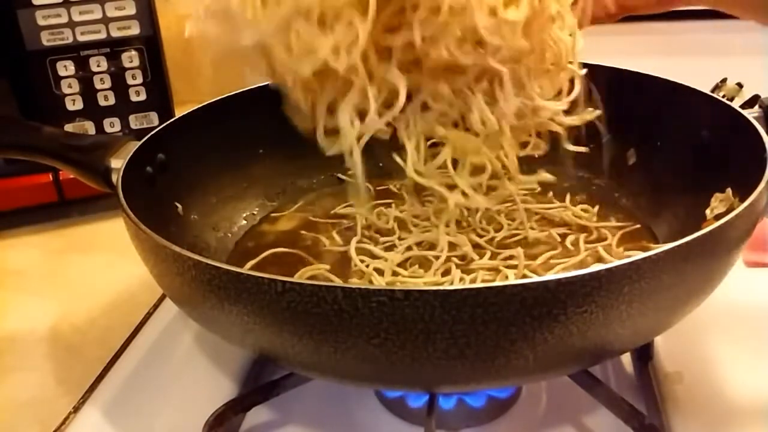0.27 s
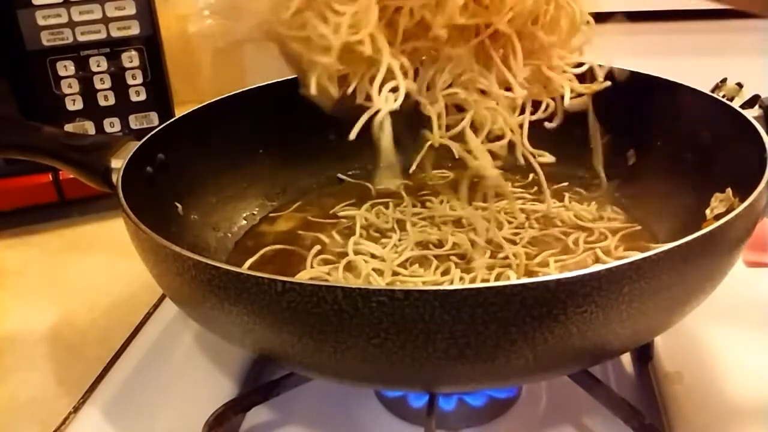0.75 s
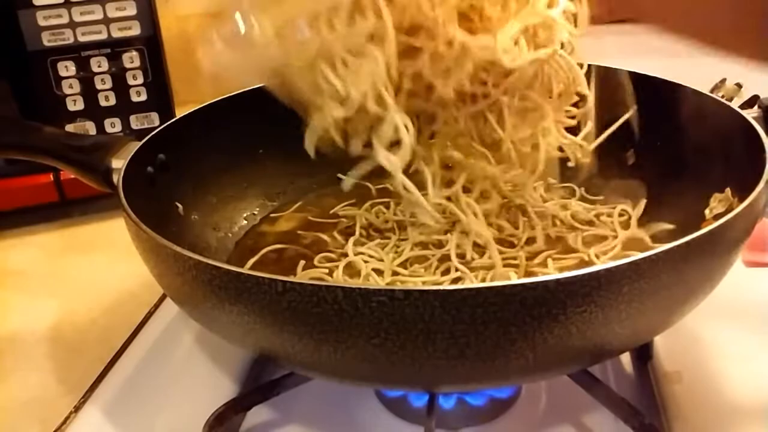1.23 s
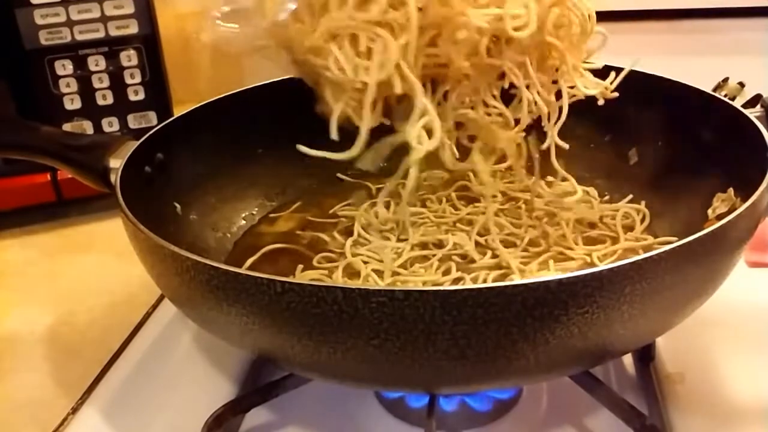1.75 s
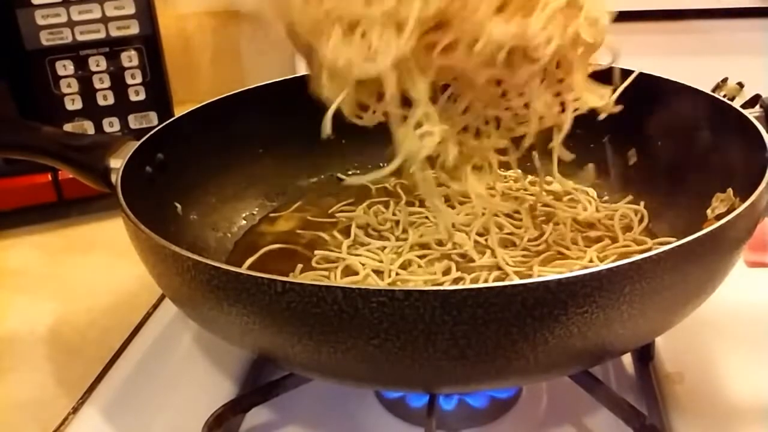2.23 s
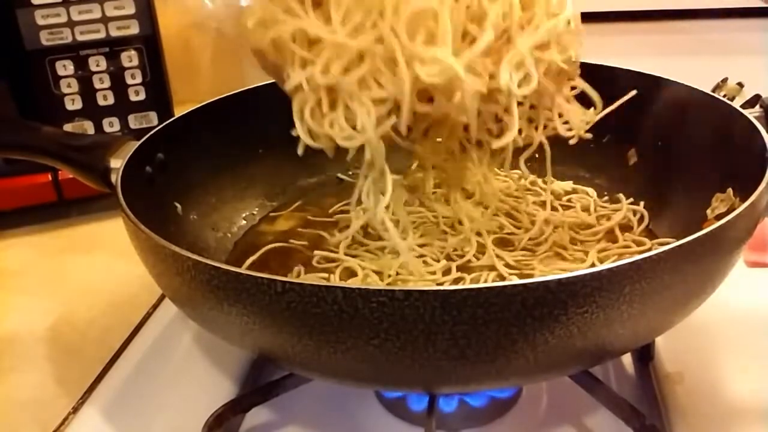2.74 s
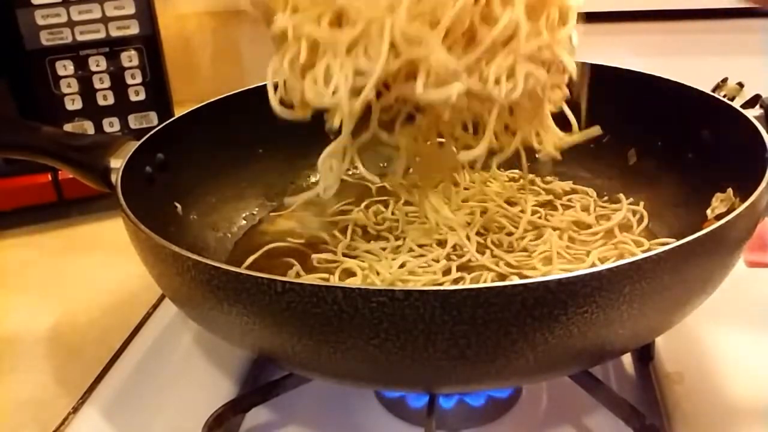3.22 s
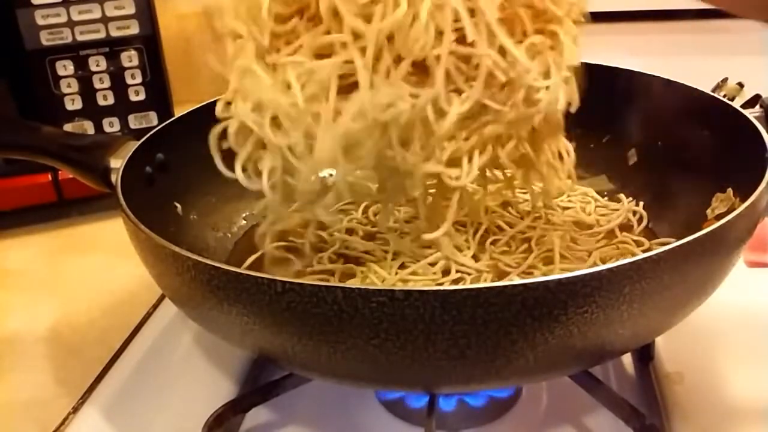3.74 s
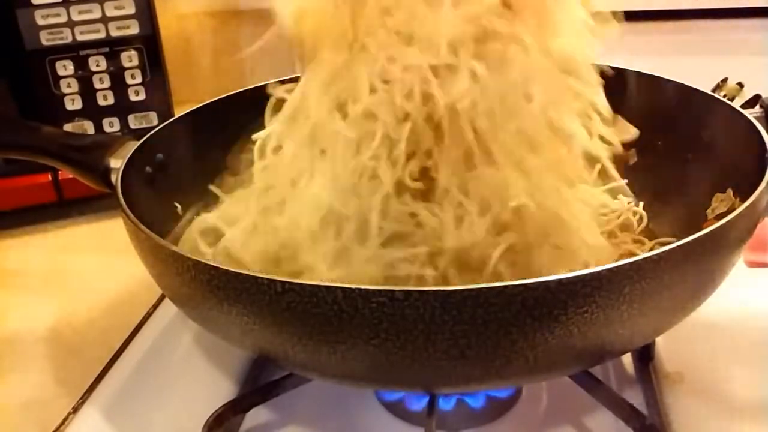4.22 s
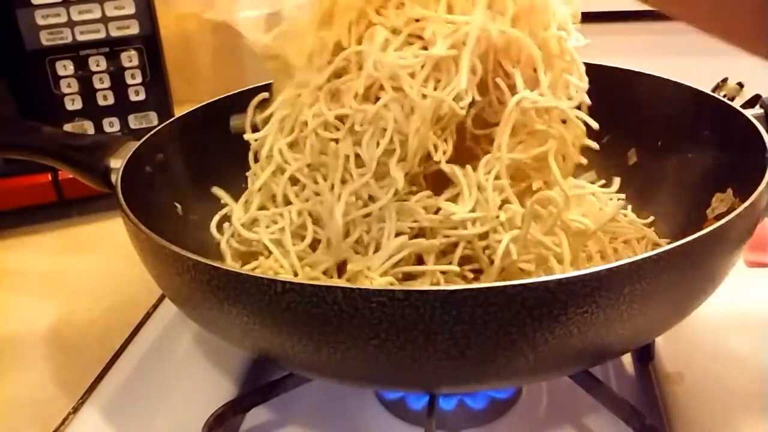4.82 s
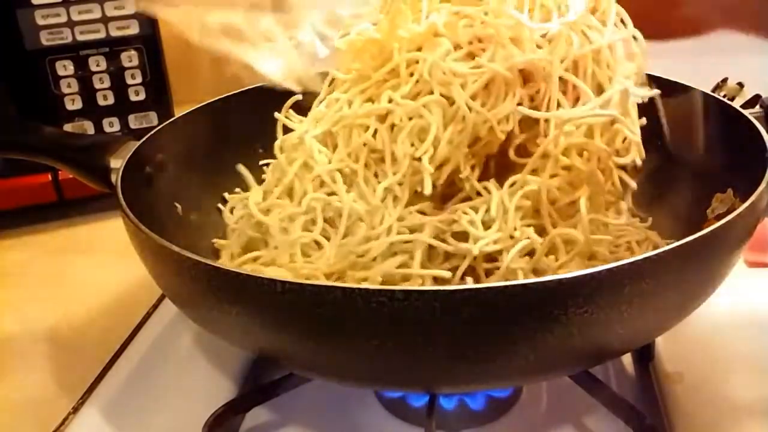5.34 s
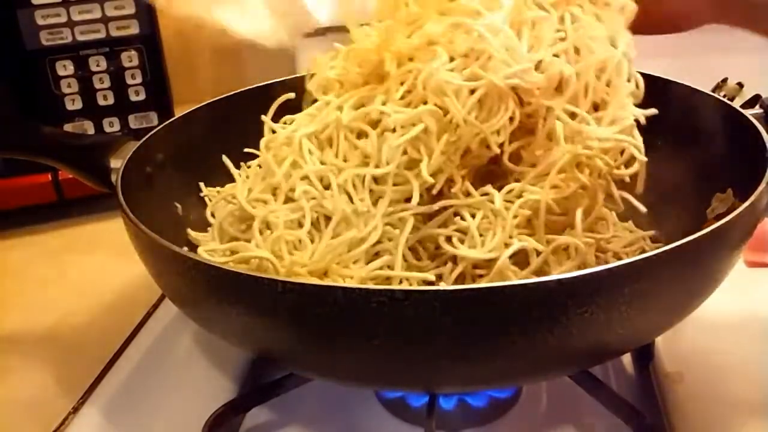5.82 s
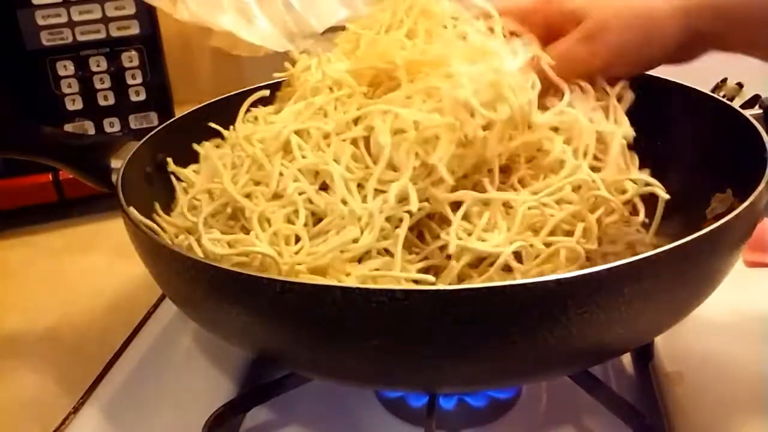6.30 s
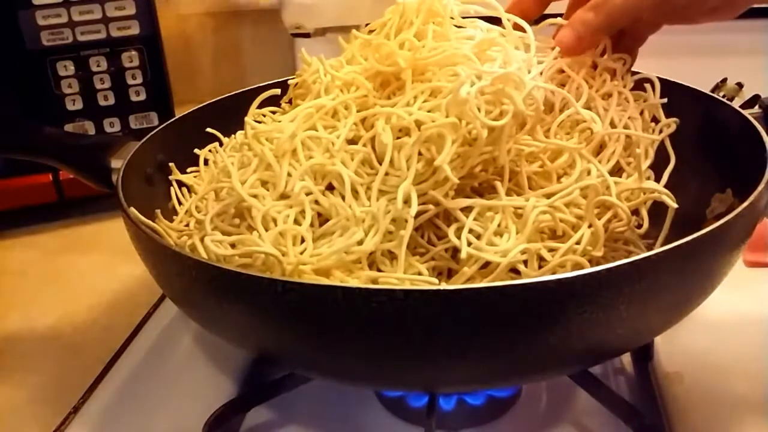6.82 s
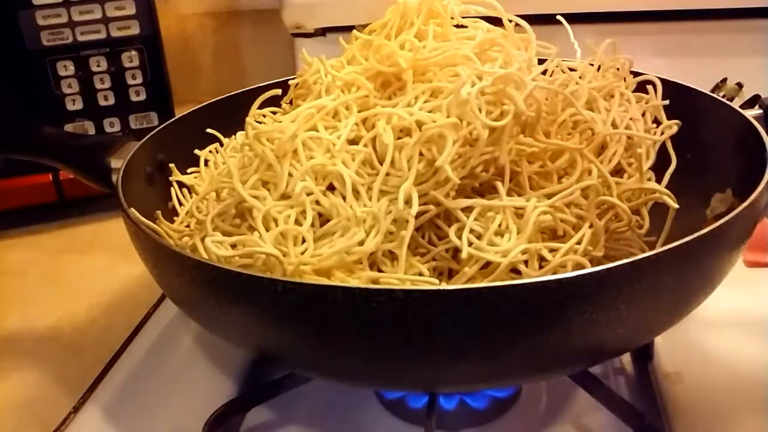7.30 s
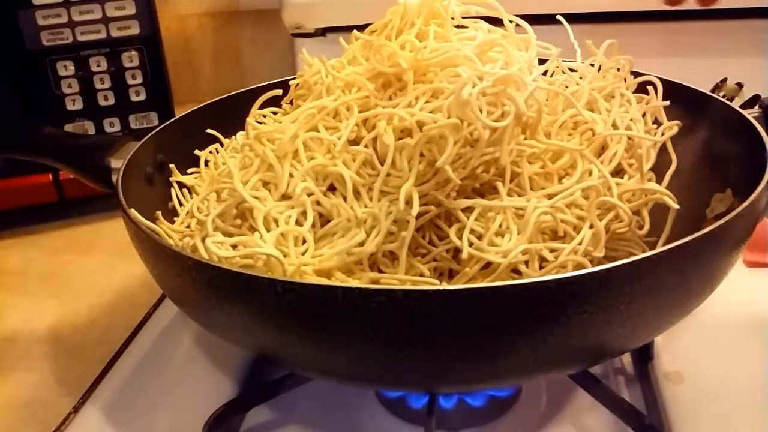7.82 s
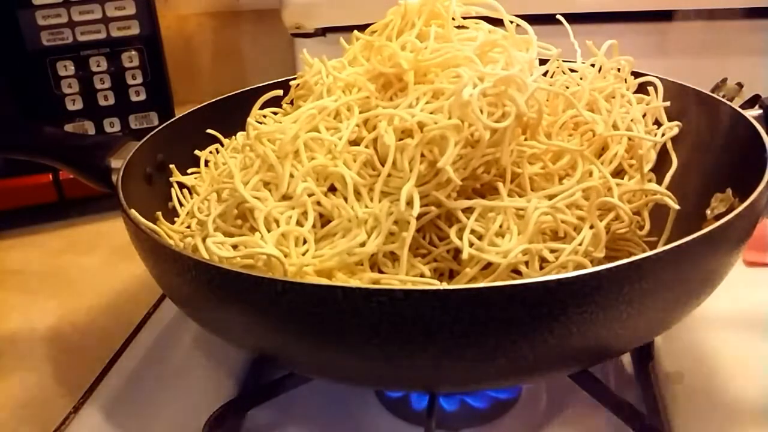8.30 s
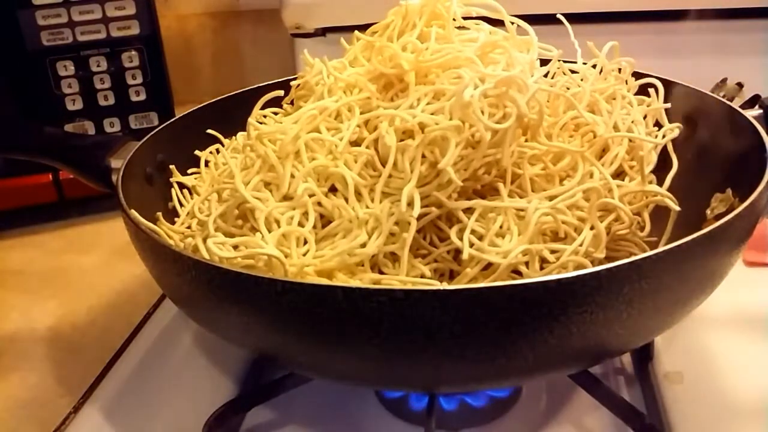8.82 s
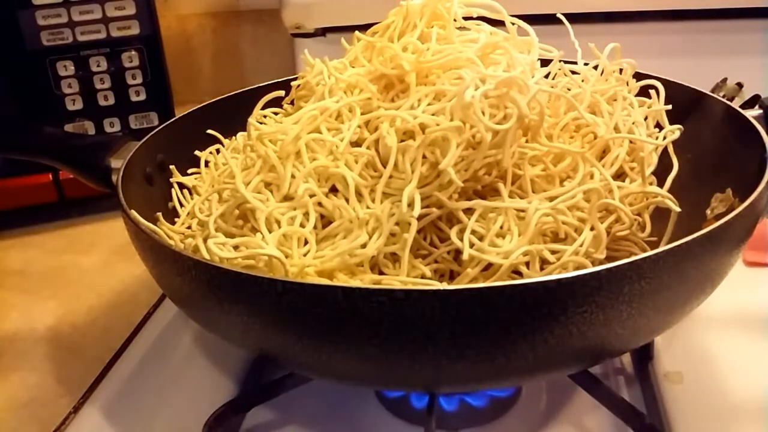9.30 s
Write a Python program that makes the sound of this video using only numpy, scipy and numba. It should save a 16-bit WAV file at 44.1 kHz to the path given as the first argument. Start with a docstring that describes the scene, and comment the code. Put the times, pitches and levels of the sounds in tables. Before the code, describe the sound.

Rapid overlapping shakes of crackly film and brittle strands, several each second, with crisp high snaps and lower flexing. A fine scraping slide empties the bag, the level falls sharply, and only scattered pops, hollow ticks and faint rustling remain. The sound drops out for an instant, then light crumpling returns and swells slightly at the end. Close phone microphone, short kitchen reverberation, very quiet flame and hum.

```python
"""A plastic bag crinkles in dense surges as dry noodles are shaken into a wok, close up in a small kitchen.
The heap slides out and settles with snaps and a fine rustle, then the empty bag is crumpled aside.
Film and strands are clumped clicks that ring as damped sines; snaps and ticks are shaped noise bursts.
A gas flame of coloured noise murmurs underneath with a faint hum; the sound drops out once."""
import sys
import numpy as np
from scipy import signal
from scipy.fft import rfft, irfft
from scipy.io import wavfile
from scipy.ndimage import uniform_filter1d
from numba import njit

SR = 44100
rng = np.random.default_rng(int(sys.argv[2]) if len(sys.argv) > 2 else 0)


def master(y):
    """Save y as 16-bit WAV."""
    cut = np.clip(np.atleast_2d(y).T, -1, 1)
    pcm = np.round(cut * 32767)  # scale
    wavfile.write(sys.argv[1], SR, pcm.astype(np.int16))


N = 421137
T = np.arange(N) / SR  # time of each sample [s]
TOP_HZ = 15900  # upper edge of the whole sound
EMPTY_S, CRUMPLED_S = 4.28, 7.05  # the bag becomes slack, then is crumpled


def undb(db):
    """Decibels to gain."""
    return 10 ** (np.asarray(db) / 20)


def unit(x):
    """Scale to rms 1."""
    return x / np.sqrt(np.mean(x ** 2))


def fade(t, t60):
    """Exponential decay, 60 dB down at t60 [s]."""
    return np.exp(-np.log(1000) * t / max(t60, 1e-4))


def add(track, s, sound):
    """Mix a sound into a track at time s [s]."""
    i = max(int(s * SR), 0)
    track[i:i + len(sound)] += sound[:N - i]


def split(x, hz):
    """The parts below and above a frequency."""
    return [signal.sosfilt(signal.butter(3, hz, kind, fs=SR, output="sos"), x) for kind in ("low", "high")]


def colour(x, points, size=2048):
    """Causal, minimum-phase filter that follows (frequency [Hz], level [dB]) points."""
    hz, db = np.transpose(points)
    f = np.maximum(np.arange(size // 2 + 1) * SR / size, 1)
    gain = undb(np.interp(np.log(f), np.log(hz), db))
    # folding the cepstrum forward in time makes the filter causal
    cepstrum = irfft(np.log(gain))
    cepstrum[1:size // 2] *= 2
    cepstrum[size // 2 + 1:] = 0
    impulse = irfft(np.exp(rfft(cepstrum)))
    return signal.oaconvolve(x, impulse)[:len(x)]


def resonate(x, hz, width):
    """One resonance, gain 1 at its centre, with a width in Hz."""
    return signal.lfilter(*signal.iirpeak(hz, hz / width, fs=SR), x)


def walk(rate):
    """Random wander: straight lines between normal draws, rate of them per second."""
    knots = np.arange(0, T[-1] + 1, 1 / rate)
    return np.interp(T, knots, rng.standard_normal(len(knots)))


def gesture(s, length, db, attack, t60):
    """Gain of one movement: it builds up to time s, holds for its length and dies away."""
    rise = np.clip((T - s) / max(attack, 1e-3) + 1, 0, 1)
    return undb(db) * rise ** 2 * fade(np.clip(T - s - length, 0, 2), t60)


@njit
def ring(start, turn, decay, size, count):
    """Sum of damped sines, one for each vibrating facet; turn and decay are per sample."""
    out = np.zeros(count)
    for k in range(len(start)):
        z, p = size[k] + 0j, np.exp(1j * turn[k] - decay[k])
        for i in range(start[k], min(start[k] + int(6 / decay[k]), count)):
            z *= p
            out[i] += z.imag
    return out


def crackle(rate, spread_db, ring_s, clump_db, count=14):
    """Clicks of very uneven size that come in clumps; each rings a handful of facets with their own pitches."""
    clicks = int(rate * T[-1])
    chance = rng.random((clicks, 2 + 2 * count))
    start = np.repeat((chance[:, 0] * N).astype(np.int64), count)
    click_db = -spread_db * np.log(np.maximum(chance[:, 1], .015))
    size = np.repeat(undb(click_db), count)
    place = .04 + .96 * chance[:, 2:2 + count].ravel()
    hz = TOP_HZ * place ** 2
    # large facets are low and ring longer
    t60 = ring_s * (.5 + chance[:, 2 + count:].ravel()) / np.sqrt(place)
    turn, decay = 2 * np.pi * hz / SR, np.log(1000) / (t60 * SR)
    x = ring(start, turn, decay, size * np.sqrt(place / t60), N)
    x = x * undb(clump_db * walk(45))
    # level the crackle over short stretches, so that each movement's own level sets its loudness
    nearby_power = uniform_filter1d(x ** 2, size=3000)
    return x / np.sqrt(nearby_power + np.mean(x ** 2) / 100)


def buckle(x, lo_hz, hi_hz, depth_db, rate, count=6):
    """The colour of the film keeps shifting, as several broad resonances wander independently in level."""
    out = x
    for hz in np.geomspace(lo_hz, hi_hz, count):
        out = out + resonate(x, hz, hz / 3) * (undb(depth_db * walk(rate)) - 1)
    return out


# film of the full bag and of the slack bag, as spectra: (frequency [Hz], relative level [dB])
FULL_BAG_SPECTRUM = [(25, -26), (60, -18.5), (110, -17.5), (170, -13), (300, -5.5), (460, 0.5), (700, -3),
                     (1200, -4), (3200, -4), (5000, -2.5), (6500, -1), (8500, -17), (12000, -20),
                     (16000, -29.5)]
EMPTY_BAG_SPECTRUM = [(40, -22), (110, -17), (200, -3.5), (400, -1.5), (800, 1), (1300, -3.5), (2300, -3.5),
                      (3500, -5), (5700, -3.5), (7200, -8), (8500, -18), (16000, -28)]
# shakes and squeezes of the bag, levels before the trims of each stage:
# (time [s], length [s], crinkle level [dB], low flexing relative to crinkle [dB])
SQUEEZES = [(0.0, 0.1, -35, -9), (0.167, 0.061, -36, -7.5), (0.334, .15, -43, -6.5),
            (0.729, 0.2, -41.5, -6), (0.969, .13, -35, -5), (1.13, 0.15, -39, -6),
            (1.254, 0.072, -34.5, -11), (1.378, 0.14, -39, -7), (1.597, .005, -44.5, -7),
            (1.71, 0.13, -47.5, -5.5), (1.811, .15, -39, -8.5), (1.982, .105, -36, -4),
            (2.093, 0.028, -37, -10.5), (2.235, 0.041, -42, -9.5), (2.286, 0.062, -36.5, -9.5),
            (2.467, 0.13, -41.5, -7.5), (2.673, 0.14, -42, -7.5), (2.813, .12, -39.5, -8),
            (3.054, 0.13, -41, -7), (3.21, .02, -44.5, -8), (3.344, 0.034, -44.5, -4),
            (3.396, 0.13, -36, -6.5), (3.525, .11, -33.5, -10.5), (3.684, 0.12, -43.5, -7.5),
            (3.811, .155, -36.5, -10), (3.984, 0.15, -46.5, -10), (4.315, 0.045, -52.5, -6),
            (4.383, 0.0099, -43.5, -3.5), (4.45, 0.13, -54.5, -17), (4.678, 0.096, -56.5, -2),
            (4.881, 0.06, -53.5, -2.5), (5.098, 0.068, -58, -2.5), (5.251, .02, -52, -9),
            (5.417, 0.12, -59, -2), (5.547, 0.026, -46, -6.5), (7.177, 0.078, -56.5, 2.5),
            (7.582, 0.018, -60, -2), (7.682, 0.02, -49.5, -8), (7.8, 0.12, -71, -15),
            (8.242, 0.0059, -53, -14), (8.357, 0.068, -70.5, 4.5), (8.55, 0.19, -78, 7.5),
            (8.752, 0.12, -68, 2.5), (8.897, .06, -53.5, -6), (8.966, .13, -50.5, -5.5),
            (9.148, .06, -46.5, -6.5), (9.239, 0.037, -53, -7), (9.33, 0.13, -66.5, 2)]
# the film tightens quickly and relaxes more slowly
SQUEEZE_ATTACK_S, SQUEEZE_T60_S, FLEX_T60_S = 0.026, 0.14, .17
# the full bag never rests in the hand (levels before the trims)
HELD_DB, HELD_FLEX_DB = -55.5, -58.5


def bag(span, spectrum, rate, spread_db, crinkle_db, flex_db, held=0):
    """Each squeeze within the span makes creases crackle in the treble while whole panels flex lower down."""
    high, low = held * undb(HELD_DB), held * undb(HELD_FLEX_DB)
    for s, length, db, share_db in SQUEEZES:
        if span[0] <= s < span[1]:
            high = np.maximum(high, gesture(s, length, db, SQUEEZE_ATTACK_S, SQUEEZE_T60_S))
            low = np.maximum(low, gesture(s, length, db + share_db, SQUEEZE_ATTACK_S, FLEX_T60_S))
    creases = crackle(rate, spread_db, ring_s=0.0041, clump_db=1.5)
    flex, crinkle = split(colour(creases, spectrum), 917)
    flex = buckle(flex, 200, 740, depth_db=2.5, rate=14)
    crinkle = buckle(crinkle, 1200, 5000, depth_db=2.5, rate=25)
    return unit(crinkle) * high * undb(crinkle_db) + unit(flex) * low * undb(flex_db)


# gas flame spectrum: (frequency [Hz], relative level [dB])
BURNER_SPECTRUM = [(25, -17.5), (56, -6.5), (80, -10.5), (150, -7.5), (200, -5.5), (260, -8), (345, 0),
                   (400, -7), (480, -10), (900, -12), (2000, -19.5), (6000, -23), (9000, -25.5),
                   (16000, -42.5)]
BURNER_DB = -76  # level about which the flame flutters


def burner():
    """The gas flame, a soft flutter of noise."""
    flame = unit(colour(rng.standard_normal(N), BURNER_SPECTRUM))
    return flame * undb(BURNER_DB + 1.2 * walk(23))


# faint kitchen hum, levels before the trim: (frequency [Hz], level [dB])
HUM_TONES = [(150.7, -96.5), (242.2, -87), (339.1, -87.5)]
HUM_TRIM_DB = -1


def hum():
    """A few faint tones that waver in pitch and strength."""
    out = np.zeros(N)
    for hz, db in HUM_TONES:
        gain = np.sqrt(2) * undb(db + HUM_TRIM_DB + 2.5 * walk(9))
        phase = 2 * np.pi * np.cumsum(hz * (1 + 0.0055 * walk(5.1))) / SR
        out = out + gain * np.sin(phase)
    return out


# general colour of a snap: (frequency [Hz], relative level [dB])
SNAP_SPECTRUM = [(60, -11.5), (170, -6), (350, 4), (1300, 8.5), (3500, -2), (6200, 2), (7200, -4),
                 (8500, -10), (12000, -14), (16000, -20)]
# single creases and strands giving way, levels before the trims:
# (time [s], level [dB], low part relative to high part [dB], pitch of the crack [Hz], t60 of the shiver [s])
SNAPS = [(0.1988, -14.5, -25, 4070, .012), (0.231, -19.5, -30, 6560, .014),
         (0.68, -31.5, -11.5, 3020, .017), (0.7254, -25.5, -24, 5600, .011),
         (0.8744, -29.5, -8.5, 5170, .016), (0.967, -26, -9, 5670, .014), (1.0166, -24, -14, 5760, .012),
         (1.1963, -22.5, -18.5, 6100, .014), (1.2825, -18.5, -26, 4900, .018),
         (1.676, -27, -20, 6500, 0.013), (1.7686, -29.5, -7, 5650, .014), (1.819, -28, -7.5, 4780, .012),
         (1.8485, -20, -20, 2850, 0.0083), (1.868, -21.5, -17, 6520, .014), (1.92, -25, -15, 5390, .012),
         (1.9966, -20, -9.5, 6400, 0.011), (2.0534, -18, -27, 5500, .019), (2.0807, -18.5, -32, 5450, .014),
         (2.292, -20.5, -12, 6000, .015), (2.785, -26, -19, 5730, .014), (2.8952, -25, -23, 5060, .01),
         (3.004, -21.5, -23, 4530, 0.011), (3.089, -24.5, -24, 2940, 0.016),
         (3.1458, -20.5, -23, 5000, .018), (3.239, -24.5, -31, 5060, .013),
         (3.3013, -30, -8.5, 6010, 0.025), (3.3796, -21, -16, 5850, .011), (3.407, -22, -17, 5450, .015),
         (3.5134, -21.5, -19, 5710, .019), (3.597, -14.5, -38, 5960, .0095),
         (3.7567, -26.5, -26, 6500, .008), (4.1765, -29.5, -20, 5200, .017),
         (4.3915, -28.5, -17, 7100, 0.013), (4.4352, -33, -31, 2950, .015), (4.4604, -32, -19, 5260, 0.016),
         (4.536, -38.5, -25, 5070, .011), (4.6109, -30, -15.5, 6300, 0.013),
         (4.686, -31.5, -20, 4680, .012), (4.712, -21.5, -18, 5070, 0.012), (5.003, -26, -17, 5900, 0.028),
         (5.1088, -43, -15, 6590, .015), (5.242, -29, -19, 5950, 0.055), (5.3665, -32, -18.5, 6310, .012),
         (5.41, -26, -14.5, 5830, .042), (5.5667, -25.5, -20, 6500, 0.012), (5.634, -41, -26, 6210, .016),
         (5.74, -43, -24, 7500, .018), (5.8597, -45.5, -23, 7500, .015), (5.9946, -43.5, -29, 6430, .014),
         (6.12, -44.5, -26, 6240, .014), (7.15, -34, -16, 5360, .011), (7.228, -33, -14, 4310, 0.016),
         (7.281, -47.5, 3, 3370, .012), (7.4601, -42.5, -11.5, 5860, 0.02), (7.646, -44, -4, 2920, .018),
         (7.6744, -46.5, 6.5, 2520, .014), (7.7082, -36, -5, 2680, .012), (7.9314, -39.5, -18, 6140, .0064),
         (8.1706, -38, -11.5, 2500, .0093), (8.2358, -40.5, 0.5, 3540, .025),
         (8.7518, -47, -18, 6100, .012), (8.8688, -40, -10, 5150, .022), (8.9055, -35.5, -13, 2900, .023),
         (9.3227, -40.5, -7.5, 5460, 0.019)]


def snaps():
    """A sharp crack, then a brief shiver of the film around it; every crease has its own pitch."""
    out, t = np.zeros(N), np.arange(SR // 10) / SR
    for s, db, low_db, hz, t60 in SNAPS:
        # the fold runs along the crease, so the crack takes a moment to build
        build = 1 - fade(t, 0.0046)
        shape = (fade(t, 0.0047) + undb(-9) * fade(t, t60)) * build
        shape = shape + undb(-30.0) * fade(t, 0.15)
        # the instant at which the fold flips
        shape = shape + undb(-4.5) * fade(abs(t - .002), .0012)
        burst = colour(rng.standard_normal(len(t)) * shape, SNAP_SPECTRUM)
        burst = burst + 1.2 * resonate(burst, hz, hz / 3)
        low, high = split(burst, 2540)
        add(out, s, undb(db - 26.5) * (unit(high) + undb(low_db + 8.0) * unit(low)))
    return out


# rubbing strands, as a spectrum: (frequency [Hz], relative level [dB])
STRAND_SPECTRUM = [(1500, -23), (3500, -19.5), (5000, -6), (6700, 0.5), (8500, -9), (11000, -14.5),
                   (16000, -26)]
# shifts of the heap, as it slides out and is patted down, levels before the trim:
# (time [s], length [s], level [dB])
SHIFTS = [(3.816, 0.31, -48.5), (4.378, 0.73, -62), (5.25, 0.29, -69.5), (5.85, 0.09, -64.5),
          (5.954, 0.27, -62), (6.38, 0.11, -76), (6.717, 0.5, -73.5)]
# a longer slide takes longer to come to rest
SHIFT_ATTACK_S, SHIFT_T60_S, SLIDE_T60_S_PER_S = 0.12, 0.33, 2.1


def strands():
    """Brittle strands scrape over each other in tiny bright ticks."""
    motion = np.zeros(N)
    for s, length, db in SHIFTS:
        t60 = SHIFT_T60_S + SLIDE_T60_S_PER_S * length
        motion = np.maximum(motion, gesture(s, length, db, SHIFT_ATTACK_S, t60))
    rubbing = crackle(rate=800, spread_db=5.0, ring_s=0.0018, clump_db=4.0)
    return unit(colour(rubbing, STRAND_SPECTRUM)) * motion * undb(-2.5)


# hollow ticks and scuffs of bent film, levels before the trim:
# (time [s], level [dB], pitch [Hz], t60 [s])
TICKS = [(4.331, -41, 1460, 0.01), (4.362, -47, 1190, .02), (4.388, -39.5, 597, 0.011),
         (4.89, -40.5, 1860, 0.015), (4.927, -41, 1900, 0.017), (5.001, -35.5, 1120, .03),
         (5.146, -42, 2960, .039), (5.351, -48, 1900, 0.022), (5.524, -44, 1700, .04),
         (6.271, -49, 1480, 0.033), (6.389, -40.5, 2890, .025), (6.392, -52, 1000, 0.023),
         (6.623, -54.5, 1910, 0.035), (7.443, -54, 1400, 0.054), (7.569, -50, 1080, .03),
         (7.604, -46, 1090, .023), (7.708, -42, 2450, 0.017), (8.072, -47.5, 1050, .008),
         (8.367, -45.5, 1030, 0.076), (8.428, -48, 790, 0.22), (8.703, -51.5, 790, 0.085),
         (8.755, -50, 2200, .3), (9.43, -48, 1500, .11)]


def ticks():
    """A small taut panel pops over with a faint crack and rings in one broad resonance."""
    out, t = np.zeros(N), np.arange(SR // 6) / SR
    for s, db, hz, t60 in TICKS:
        push = rng.standard_normal(len(t)) * fade(t, t60)
        width = 0.36 * hz
        tone = resonate(resonate(push, hz, width), hz, width)
        crack = colour(rng.standard_normal(len(t)) * fade(t, t60 / 2), EMPTY_BAG_SPECTRUM)
        add(out, s, undb(db - 26.0) * (unit(tone) + undb(-5.5) * unit(crack)))
    return out


BOWL_LOW_HZ = 910  # the bowl is too small to throw back longer waves


def bowl(x, db, t60):
    """The steel bowl throws each crack straight back, a fixed cluster of very short echoes."""
    t = np.arange(SR // 25) / SR
    scatter = rng.standard_normal(len(t)) * fade(t, t60) * (t > .001)
    echoes = split(scatter, BOWL_LOW_HZ)[1]
    return x + undb(db) * signal.oaconvolve(x, unit(echoes))[:N] / np.sqrt(len(t))


def linger(power, t60):
    """Energy that is stored and leaks away, 60 dB down at t60."""
    keep = fade(2 / SR, t60)
    return signal.lfilter([1 - keep], [1, -keep], power)


# tail of the kitchen: (frequency [Hz], t60 [s])
KITCHEN_TAIL = [(200, 0.39), (1500, 0.41), (10000, 0.31)]


def kitchen(x, early_db, early_t60, late_db, count=28):
    """Diffuse echoes, band by band: a quick flurry from pan and stove, then the tail of the room."""
    edges = np.geomspace(120, TOP_HZ, count)
    hz, t60s = np.transpose(KITCHEN_TAIL)
    air, out = rng.standard_normal(N), x
    for lo, hi in zip(edges, edges[1:]):
        band = signal.butter(3, [lo, hi], "band", fs=SR, output="sos")
        power = signal.sosfilt(band, x + 1e-9 * air) ** 2
        t60 = np.interp(np.log(lo), np.log(hz), t60s)
        echoes = undb(2 * early_db) * linger(power, early_t60) + undb(2 * late_db) * linger(power, t60)
        # the stored energy sets the loudness of steady noise in this band
        out = out + np.sqrt(echoes) * unit(signal.sosfilt(band, air))
    return out


# resonances of the air in the wok and the bag: (frequency [Hz], width [Hz], level [dB])
HOLLOW_MODES = [(232, 96, -6.5), (310, 17, -4), (454, 63, -5.5), (797, 28, -9), (1048, 86, -13),
                (1920, 92, -13), (2790, 52, -18.5), (5600, 60, -9.5)]


def hollow(x):
    """The air in the wok and the bag favours a few pitches."""
    return x + sum(undb(db) * resonate(x, hz, width) for hz, width, db in HOLLOW_MODES)


HELD_LEAD_S = 0.046  # the weight leaves the bag just before it is empty
SHADE_HZ, SHADE_DB = 8000, -1  # put aside, the crumpled bag loses some treble


def scene():
    """Bag, noodles and flame in the kitchen: the bag is first full, then slack, then crumpled."""
    held = fade(np.clip(T - EMPTY_S + HELD_LEAD_S, 0, 2), SQUEEZE_T60_S)
    pour = bag((-np.inf, EMPTY_S), FULL_BAG_SPECTRUM, rate=650, spread_db=3.5,
               crinkle_db=-3.5, flex_db=-5, held=held)
    empty = bag((EMPTY_S, CRUMPLED_S), EMPTY_BAG_SPECTRUM, rate=340, spread_db=4.5,
                crinkle_db=-7.5, flex_db=-7.5)
    crumple = bag((CRUMPLED_S, np.inf), EMPTY_BAG_SPECTRUM, rate=800, spread_db=3.0,
                  crinkle_db=-4, flex_db=-7.0)
    film = pour + empty + crumple + snaps() + ticks()
    treble = signal.sosfiltfilt(signal.butter(2, SHADE_HZ, "high", fs=SR, output="sos"), film)
    film = film + treble * (undb(SHADE_DB) - 1) * (T > CRUMPLED_S)
    near = bowl(film + strands(), db=-7.5, t60=0.065)
    room = kitchen(near, early_db=-4.5, early_t60=0.094, late_db=-3)
    return (hollow(room) + burner() + hum())[None]


# the moment of silence: (start [s], end [s])
DROPOUT = (6.988, 7.126)
SOFT_PEAK = .14  # amplitude that rounded peaks approach


def record(dry):
    """The phone rounds the sharpest peaks, drops out for a moment and cuts the top."""
    running = (T < DROPOUT[0]) | (T > DROPOUT[1])
    rounded = SOFT_PEAK * np.tanh(dry / SOFT_PEAK)
    top_cut = signal.ellip(10, .2, 70, TOP_HZ, fs=SR, output="sos")
    return signal.sosfilt(top_cut, rounded * running)


dry = scene()
out = record(dry)
master(out)
```